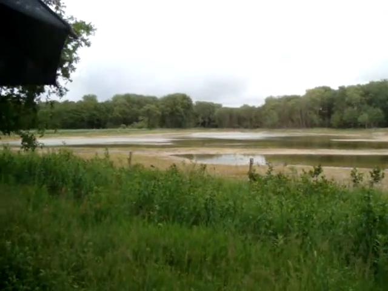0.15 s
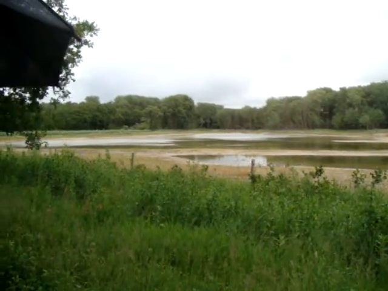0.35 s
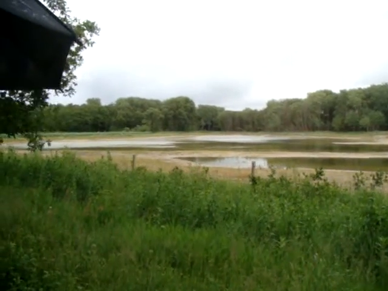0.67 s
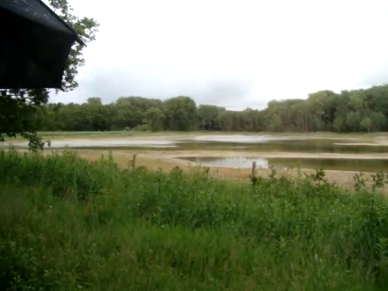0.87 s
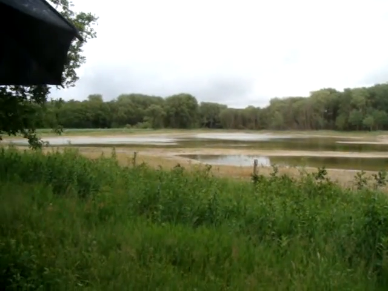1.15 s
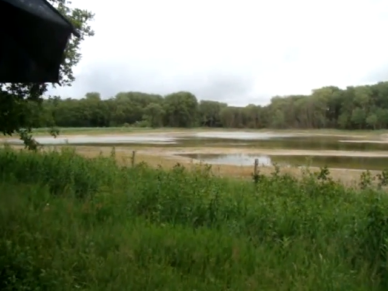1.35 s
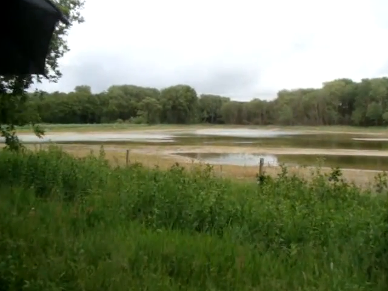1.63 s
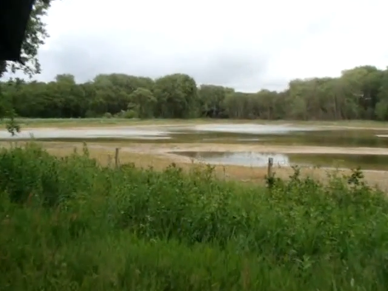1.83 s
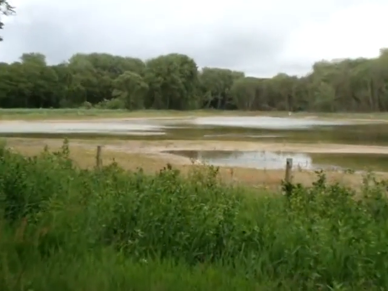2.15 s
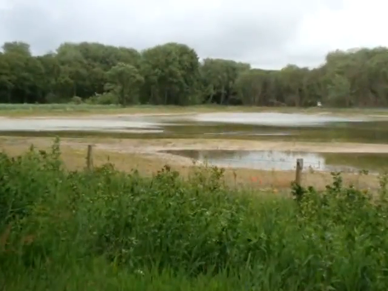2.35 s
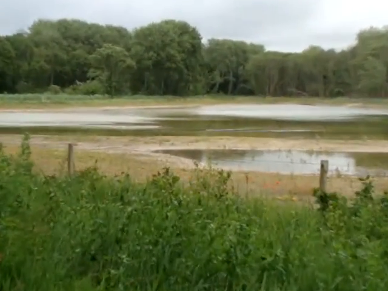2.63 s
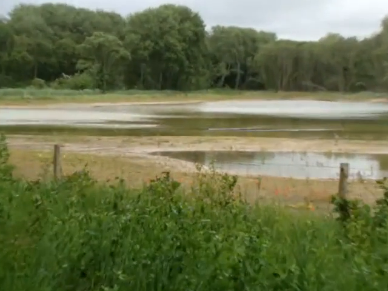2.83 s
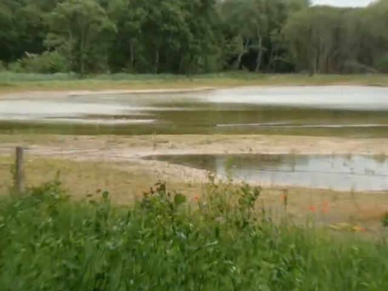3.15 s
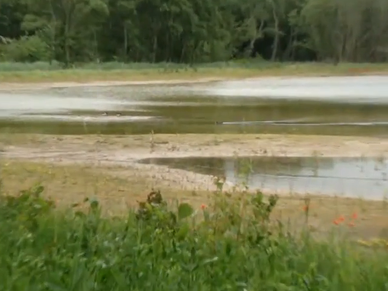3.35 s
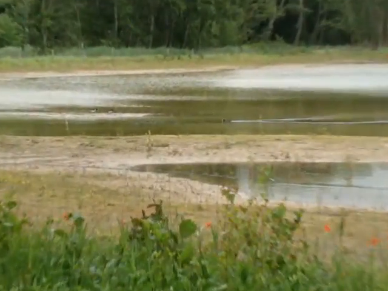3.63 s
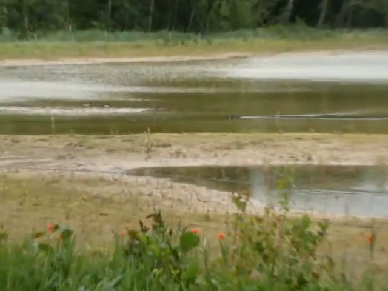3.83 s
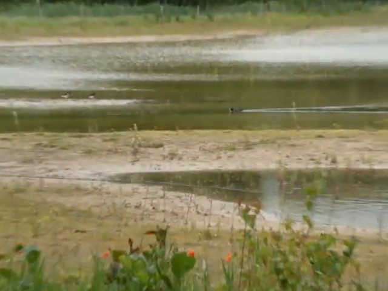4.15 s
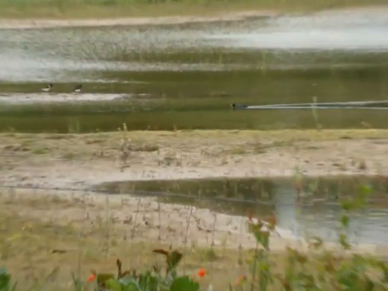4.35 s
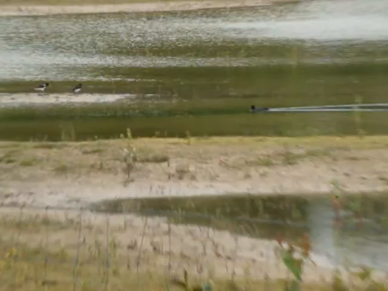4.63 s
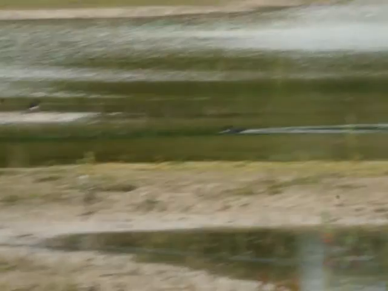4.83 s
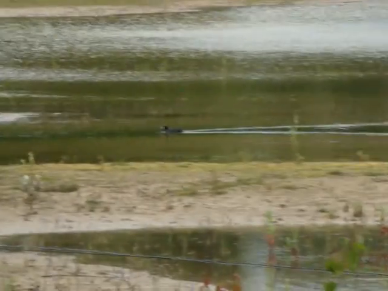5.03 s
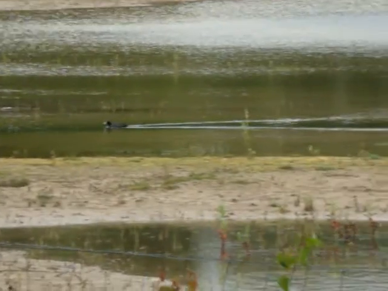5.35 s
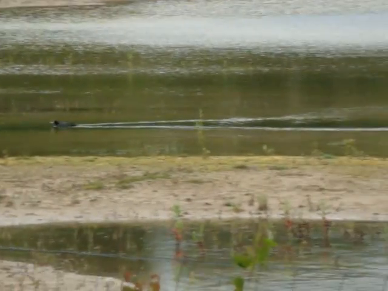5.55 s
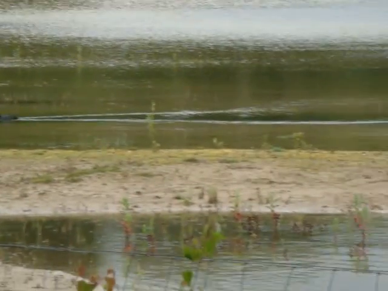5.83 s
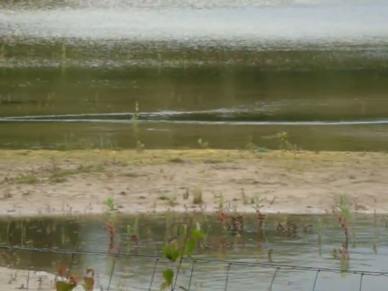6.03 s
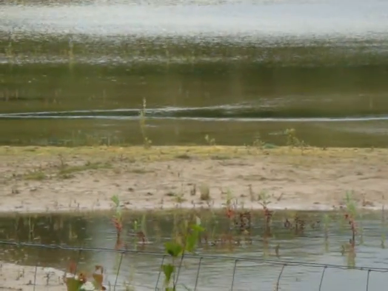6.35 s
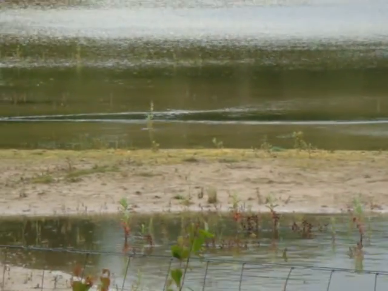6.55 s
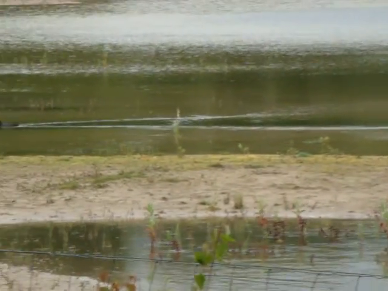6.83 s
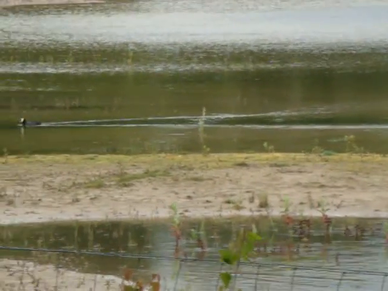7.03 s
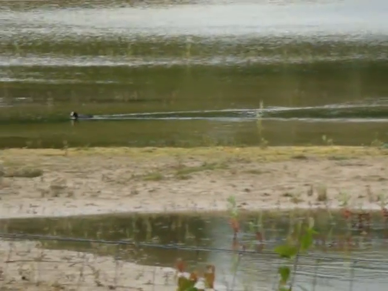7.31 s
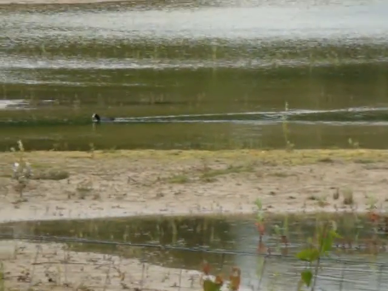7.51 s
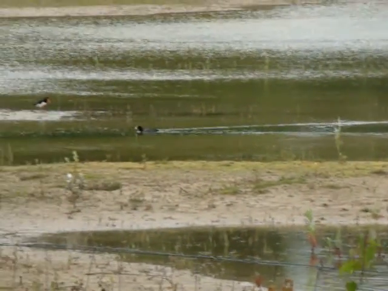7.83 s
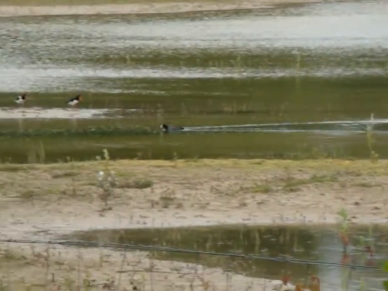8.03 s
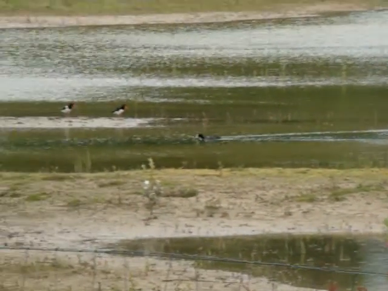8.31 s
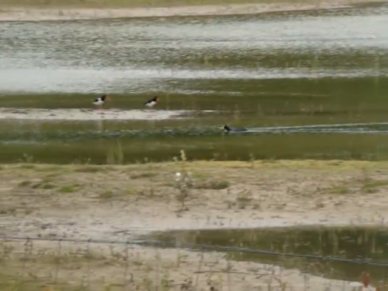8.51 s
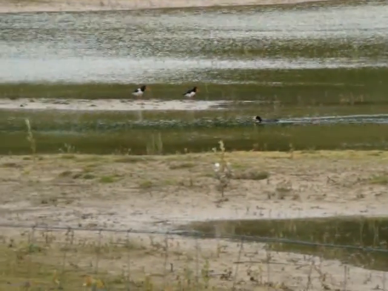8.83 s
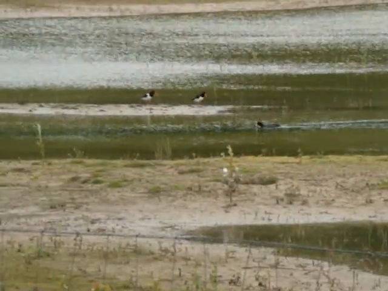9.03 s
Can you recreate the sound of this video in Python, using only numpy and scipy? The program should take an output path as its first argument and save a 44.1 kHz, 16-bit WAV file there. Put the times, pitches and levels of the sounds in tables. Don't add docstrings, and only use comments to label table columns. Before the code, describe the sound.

Outdoors at a wet marsh, a finger click on a small camera is followed at once by shorebirds' rapid, shrill piping, notes tumbling over one another. Low thumps, ticks and soft wind buffeting sit close to the microphone for about three seconds. The piping thins, faint frog and waterfowl clucks appear, then brisk whistles return and space out over a soft leafy hiss.

```python
import sys
import numpy as np
from scipy import signal
from scipy.io import wavfile
from scipy.ndimage import uniform_filter1d, minimum_filter1d, map_coordinates

SR = 44100
rng = np.random.default_rng(int(sys.argv[2]) if len(sys.argv) > 2 else 0)


def decibels_to_gain(level_db):
    exponent = np.asarray(level_db, float) / 20
    return 10 ** exponent


def store_pcm(level_fs):
    pcm = np.round(np.clip(level_fs, -1, 1) * 32767).astype(np.int16)
    wavfile.write(sys.argv[1], SR, np.atleast_2d(pcm).T)


N = 404397


def unit(x):
    return x / np.sqrt(np.mean(x ** 2) + 1e-20)


def along(points, hz):
    f, v = np.transpose(points)
    return np.interp(np.log(hz + 1), np.log(f + 1), v)


def curves(rows):
    s, *cols = np.transpose(rows)
    return [np.interp(np.arange(N) / SR, s, c) for c in cols]


def wobble(rate, size=N):
    knots = rng.standard_normal(int(size * rate / SR) + 4)
    return map_coordinates(knots, [np.arange(size) * rate / SR])


def add(track, s, sound):
    part = track[max(round(s * SR), 0):][:len(sound)]
    part += sound[:len(part)]


def rush(spectrum, patchy_db):
    hz, _, z = signal.stft(rng.standard_normal(N + 512), SR, nperseg=1024)
    field = uniform_filter1d(rng.standard_normal(z.shape), 10, 0)
    field = uniform_filter1d(field, 6, 1)
    gain_db = patchy_db * unit(field) + along(spectrum, hz)[:, None]
    return unit(signal.istft(z * decibels_to_gain(gain_db), SR, nperseg=1024)[1][:N])


# (time [s], murmur [dB], leaf hiss [dB])
MARSH_LEVELS = [
    (0.0, -48, -40.5),
    (0.25, -48.5, -46),
    (4.72, -45.5, -42.5),
    (6.03, -48.5, -49.5),
    (7.3, -48, -51),
    (9.17, -47.5, -52.5),
]
# (frequency [Hz], density [dB per Hz])
MURMUR_SPECTRUM = [(18, -59.5), (30, -39), (114, -33), (183, -14), (364, -7), (499, -3.5), (673, -2),
                   (2000, -8), (2600, -59.5), (4400, -120)]
# (frequency [Hz], density [dB per Hz])
LEAF_SPECTRUM = [(1200, -120), (1800, 0), (4000, 2.5), (6000, -1.5), (9000, -2), (10000, -9.5),
                 (10300, -40.5)]


def marsh():
    murmur_db, hiss_db = curves(MARSH_LEVELS)
    murmur = decibels_to_gain(murmur_db + 0.53 * wobble(10)) * rush(MURMUR_SPECTRUM, patchy_db=0.55)
    hiss = decibels_to_gain(hiss_db + 3.5) * rush(LEAF_SPECTRUM, patchy_db=0.4)
    return murmur + hiss


def knocks(events, t60, rough, rise, snap_db):
    out, t = np.zeros(N), np.arange(SR // 5) / SR
    for s, db, hz in events:
        drift = rough * np.cumsum(rng.standard_normal(len(t))) * np.sqrt(hz / SR)
        decay = decibels_to_gain(-60 * t / t60)
        tone = np.sin(2 * np.pi * hz * t + drift) * decay * (1 - np.exp(-t / rise))
        snap = decibels_to_gain(snap_db - 60 * t / 0.0096) * rng.standard_normal(len(t))
        add(out, s, decibels_to_gain(db + 6.0) * (tone + snap))
    return out


# (time [s], peak level [dB], pitch [Hz])
FROG_CLUCKS = [(3.684, -31.5, 696), (3.726, -34.5, 560), (3.96, -29, 590), (4.061, -32, 767),
               (4.192, -30, 726), (4.214, -28.5, 840), (4.249, -42, 820), (4.282, -31, 720),
               (4.343, -34, 826), (4.529, -27, 543), (4.574, -32, 755), (4.655, -30, 776),
               (4.723, -28, 742)]
# (time [s], peak level [dB], pitch [Hz])
FOWL_CLUCKS = [
    (4.6129, -43, 1395),
    (4.9578, -42, 1354),
    (5.1029, -43, 1204),
    (5.6952, -41.5, 1164),
    (5.7502, -40, 1240),
    (5.8301, -43, 1200),
    (6.4837, -41, 1232),
    (6.544, -42.5, 1280),
]


def far_clucks():
    frogs = knocks(FROG_CLUCKS, 0.03, rough=1.32, rise=0.0028, snap_db=-36)
    fowl = knocks(FOWL_CLUCKS, 0.13, rough=0.53, rise=0.0028, snap_db=-32)
    return signal.sosfilt(signal.butter(3, 350, "high", fs=SR, output="sos"), frogs + fowl)


# (time [s], buffet level [dB])
WIND_LEVELS = [
    (0.0, -60),
    (0.39, -57.5),
    (0.77, -55),
    (0.81, -49.5),
    (1.11, -56),
    (1.41, -54),
    (1.47, -53),
    (1.55, -53),
    (2.84, -51.5),
    (3.6, -58),
]
# (frequency [Hz], density [dB per Hz])
BUFFET_SPECTRUM = [(15, -36), (40, -9), (100, -8.5), (200, -7.5), (400, -3), (900, -36)]


def wind():
    lumps = decibels_to_gain(3.8 * wobble(25))
    return decibels_to_gain(curves(WIND_LEVELS)[0]) * unit(lumps * rush(BUFFET_SPECTRUM, patchy_db=-1.0))


# (time [s], peak level [dB], pitch [Hz])
FINGER_THUMPS = [(0.318, -34, 96), (0.369, -32.5, 217), (0.549, -39, 134), (0.599, -36.5, 153),
                 (0.824, -25, 188), (0.854, -33, 143), (0.994, -35.5, 249), (1.467, -33.5, 111),
                 (1.584, -37, 291), (1.644, -29.5, 430), (1.795, -31, 387), (1.849, -38, 352),
                 (2.14, -36, 140), (2.192, -32.5, 320), (2.299, -38, 145), (2.433, -34, 391),
                 (2.76, -43, 107), (2.868, -38, 206), (2.938, -47, 222), (3.099, -41, 89)]
# (time [s], peak level [dB], pitch [Hz])
CASE_CLICKS = [
    (0.0162, -35, 1005),
    (0.7567, -29, 1604),
    (.7615, -31, 3430),
    (0.9932, -36, 1170),
    (2.006, -35, 1000),
    (2.02, -37.5, 745),
    (2.034, -34, 1320),
    (2.9704, -29.5, 1217),
    (3.3782, -33, 1480),
    (3.7723, -38, 1160),
]


def hands():
    thumps = knocks(FINGER_THUMPS, 0.064, rough=2.22, rise=0.0034, snap_db=-41)
    clicks = knocks(CASE_CLICKS, 0.027, rough=1.68, rise=0.00027, snap_db=3)
    return signal.sosfilt(signal.butter(2, 70, "high", fs=SR, output="sos"), thumps + clicks)


# (frequency [Hz], decay t60 [s], strength [dB])
TREE_DECAY = [(1000, 0.66, -2), (2500, 0.99, 0.5), (3600, 0.67, -1.5), (4860, 0.52, 4.5), (8200, 0.43, 0.5)]
# (time [s], gain [dB])
TREE_ANSWER = [(0, -0.8), (1.2, 1.6), (2, -1.5), (3.3, -1), (4.2, 3), (5.22, 4.5), (5.3, -3), (5.5, 0),
               (5.7, 1), (6.8, -0.2), (8, 0), (9.17, 0.5)]


def trees(x):
    x = x * decibels_to_gain(curves(TREE_ANSWER)[0])
    gap = 0.032
    out, step = np.zeros(N), SR // 4
    for at in range(0, N, step):
        hz, t, z = signal.stft(rng.standard_normal(SR * 4 // 5), SR, nperseg=256)
        t60, strength_db = [along(np.array(TREE_DECAY)[:, [0, col]], hz)[:, None] for col in (1, 2)]
        shape = decibels_to_gain(-60 * t / t60) * (0.94 + np.clip(t / gap, 0, 1) ** 3)
        shape = shape / np.linalg.norm(shape, axis=1, keepdims=True)
        tail = signal.istft(z * shape * decibels_to_gain(strength_db), SR, nperseg=256)[1]
        add(out, at / SR, signal.fftconvolve(x[at:at + step], tail / np.linalg.norm(tail)))
    return out * decibels_to_gain(1.8 * wobble(70))


def ripples(x, t60):
    out, step, t = np.zeros(N), SR // 10, np.arange(SR // 25) / SR
    for at in range(0, N, step):
        bounces = rng.standard_normal(len(t)) * decibels_to_gain(-60 * t / t60)
        piece = x[at:at + 2 * step] * np.hanning(2 * step)[:N - at]
        add(out, at / SR + 0.001, signal.fftconvolve(piece, bounces / np.linalg.norm(bounces)))
    return out


# (time [s], length [s], top pitch [Hz], level [dB])
HEAD_ON_NOTES = [(1.98, 0.073, 2652, -23), (2.093, 0.028, 2590, -27.5), (2.227, 0.048, 2644, -27.5),
                 (2.444, 0.034, 2512, -34), (2.52, 0.03, 2524, -29), (2.564, 0.04, 2473, -33),
                 (2.604, 0.037, 2643, -27), (2.73, 0.033, 2508, -26), (4.468, 0.029, 2460, -41.5),
                 (4.835, 0.027, 2450, -45), (5.702, 0.021, 2226, -37), (5.828, 0.035, 2307, -38),
                 (5.886, 0.019, 2330, -38), (6.006, 0.033, 2294, -36), (6.046, 0.047, 2642, -37.5),
                 (6.313, 0.034, 2640, -31.5), (6.667, 0.035, 2487, -38.5), (6.808, 0.054, 2637, -40),
                 (7.171, 0.028, 2448, -29.5), (7.196, 0.028, 2473, -30), (7.228, 0.054, 2595, -29),
                 (7.378, 0.05, 2557, -29), (7.434, 0.034, 2400, -35.5), (7.507, 0.043, 2620, -32.5),
                 (7.699, 0.037, 2345, -38), (8.007, 0.027, 2430, -34.5), (8.717, 0.031, 2275, -36)]
HALF_TURNED_NOTES = [(0.135, 0.024, 3037, -24.5), (0.162, 0.044, 3040, -26.5), (1.556, 0.034, 2570, -33),
                     (0.735, 0.022, 2510, -30), (0.941, .032, 2606, -28.5), (1.962, 0.033, 2566, -27),
                     (2.13, 0.031, 2510, -22.5), (2.797, 0.044, 2613, -25), (2.906, 0.029, 2320, -33),
                     (2.953, 0.028, 2320, -30), (3.003, 0.024, 2290, -32), (3.056, 0.023, 2260, -36),
                     (3.095, 0.044, 2661, -26), (3.609, .033, 2493, -30.5), (3.725, 0.032, 2650, -36),
                     (5.5, 0.023, 2150, -38), (6.201, 0.042, 2460, -32.5), (6.225, .028, 2444, -28.5),
                     (6.278, 0.03, 2570, -32.5), (6.5, .042, 2612, -31.5), (6.581, 0.03, 2790, -32),
                     (7.016, 0.041, 2683, -35), (7.008, 0.052, 2606, -30.5), (7.533, 0.045, 2611, -31.5),
                     (7.812, 0.043, 2685, -30.5), (8.376, 0.03, 2230, -36)]
SIDE_ON_NOTES = [(0.062, 0.039, 2530, -30.5), (1.995, .036, 2480, -34), (1.882, 0.034, 2520, -39),
                 (0.442, 0.051, 2930, -28.5), (0.716, 0.084, 2970, -30.5), (.826, 0.028, 2960, -23),
                 (.812, .075, 2670, -30.5), (5.001, 0.058, 2453, -37.5), (1.611, 0.019, 2570, -25),
                 (2.181, 0.036, 2746, -20.5), (2.401, 0.055, 2830, -27), (3.165, 0.033, 2620, -48),
                 (6.752, 0.06, 2700, -33.5), (6.93, 0.038, 2420, -31.5), (6.952, 0.028, 2380, -34.5),
                 (3.043, 0.034, 2673, -22.5), (3.235, 0.044, 2645, -27.5), (3.429, 0.047, 2684, -29),
                 (3.465, 0.036, 2450, -35), (3.504, 0.05, 2634, -32.5), (5.629, 0.04, 2400, -30.5),
                 (6.427, 0.029, 2490, -29), (6.486, 0.028, 2398, -32.5), (6.725, 0.051, 2500, -34.5),
                 (7.26, 0.03, 2576, -29.5), (8.029, 0.035, 2670, -28.5)]
TURNED_AWAY_NOTES = [(0.086, 0.029, 2500, -27.5), (0.23, 0.026, 2475, -28.5), (0.282, 0.017, 2430, -31.5),
                     (0.33, 0.023, 2380, -32), (0.636, 0.033, 2363, -32), (1.076, 0.029, 2620, -32),
                     (1.025, 0.058, 2930, -27.5), (1.538, 0.038, 2416, -31), (1.618, 0.033, 2924, -24),
                     (1.764, 0.037, 2500, -24.5), (1.817, .036, 2910, -23), (1.841, 0.031, 2420, -32),
                     (4.864, 0.025, 2080, -41), (2.327, 0.04, 2483, -25.5), (3.291, 0.043, 2610, -30.5),
                     (3.335, 0.019, 2310, -38), (3.391, 0.021, 2300, -34), (3.641, 0.075, 2640, -30.5),
                     (4.524, 0.062, 2460, -41), (5.227, 0.04, 2274, -38.5), (5.321, 0.041, 2440, -35.5),
                     (5.439, 0.032, 2425, -32), (5.945, 0.036, 2440, -33.5)]
BEAM_LEVELS = [-1.5, -5, -8.5, -9.5]


def arched_notes():
    easy_hz, notes = 2500, []
    tables = [HEAD_ON_NOTES, HALF_TURNED_NOTES, SIDE_ON_NOTES, TURNED_AWAY_NOTES]
    for rows, over_db in zip(tables, BEAM_LEVELS):
        for s, length, hz, db in rows:
            arch = 0.036 + 1.3 * length + 0.25 * max(np.log2(hz / easy_hz), 0)
            notes.append((s, length, hz, arch, -0.02, 0.22, 0.2, db, over_db))
    return notes


# (time [s], top pitch [Hz], level [dB])
FAR_PIPS = [
    (3.718, 3100, -29.5),
    (4.003, 3147, -31.5),
    (4.256, 3046, -33.5),
    (4.57, 3050, -35),
]


def pips():
    return [(s, 0.027, hz, 0.0492, -0.02, 0.11, 0.12, db, -11.5) for s, hz, db in FAR_PIPS]


# (time [s], length [s], top pitch [Hz], level [dB], overtones [dB])
CLIMBING_NOTES = [(0.345, 0.045, 2642, -27.5, -9.5), (2.646, 0.039, 2846, -27, -11),
                  (2.881, .05, 2783, -24.5, -7.5), (5.421, 0.035, 2976, -28, -18),
                  (5.736, 0.043, 2956, -31.5, -15), (7.778, 0.052, 2700, -32.5, -4),
                  (8.088, 0.054, 2782, -30.5, -5.5), (8.245, 0.039, 2680, -30.5, -7),
                  (8.442, .046, 2758, -31, -6), (8.508, 0.046, 2793, -33.5, -9),
                  (8.806, 0.053, 2787, -27.5, -3.5), (9.044, 0.043, 2780, -29, -13)]


def climbing_notes():
    return [(s, length, hz, 0.16, 0.0506, 0.15, 0.2, db, over_db)
            for s, length, hz, db, over_db in CLIMBING_NOTES]


# (time [s], length [s], pitch [Hz], level [dB], overtones [dB])
WHISTLE_NOTES = [(0.538, 0.15, 3293, -26, -3), (1.101, 0.029, 2962, -23, -8), (1.141, .04, 2680, -27.5, -5),
                 (1.273, 0.026, 2980, -46, -6), (1.314, .04, 2929, -32, 0.5), (2.012, 0.14, 3408, -23.5, -7.5),
                 (2.321, 0.037, 2680, -35, -12), (2.558, 0.12, 3310, -25.5, -5),
                 (4.853, 0.039, 2950, -41.5, -16), (5.144, 0.032, 2910, -34.5, -16),
                 (5.313, 0.14, 3221, -32.5, -6.5)]


def whistles():
    easy_hz, breath_s, notes = 3277, 0.138, []
    for s, length, hz, db, over_db in WHISTLE_NOTES:
        lean = -0.5 * max(hz / easy_hz - 1, 0)
        drop = 0.07 if length > breath_s else 0.003
        notes.append((s, length, hz, 0.14 * length, lean, 0.027, drop, db, over_db))
    return notes


# (time [s], length [s], pitch [Hz], level [dB])
HELD_NOTES = [
    (1.219, 0.073, 2414, -43),
    (1.297, .085, 2732, -30),
    (1.489, 0.09, 2719, -27.5),
    (1.738, 0.089, 2720, -27.5),
    (3.858, 0.098, 2583, -42.5),
    (4.075, 0.09, 2580, -42.5),
]


def held_notes():
    return [(s, length, hz, 0.032, 0.009, 0.04, 0.02, db, -2) for s, length, hz, db in HELD_NOTES]


# (time [s], mid pitch [Hz], level [dB])
FALLING_NOTES = [
    (3.885, 2235, -45.5),
    (4.112, 2200, -48.5),
    (4.318, 2130, -47),
    (4.54, 2116, -48),
    (4.765, 2100, -46.5),
    (5.004, 2214, -51.5),
]


def falling_notes():
    return [(s, 0.099, hz, 0.045, -0.2, 0.04, 0.03, db, 4) for s, hz, db in FALLING_NOTES]


# (time [s], gain of multiples 3 and 4 [dB], fundamental's loss per unit of sag [dB],
# octave's loss per unit of sag [dB], arch depth [share])
STANCE = [(0, -1, 20, 36, 1.1), (1.2, -2, 24, 42, .9), (2, -3, 17, 40, .95), (3.3, -2.5, 22, 38, .95),
          (4.2, -9, 34, 8, .95), (5.4, -9, 26, 10, .95), (6, -12.5, 24, 8, 1.05), (6.5, -7, 24, 10, 1.05),
          (6.7, -3, 30, 40, .85), (7.15, -2.5, 34, 34, .55), (7.6, -2, 36, 36, .55),
          (7.75, -2, 22, 42, 1.05), (8.6, -1, 22, 40, 1.05), (9.17, 0, 24, 30, 1.05)]
HIGH_SLACK = [43.5, 47]
# (frequency [Hz], gain [dB])
THROAT_GAIN = [(1000, -13), (1900, -11.5), (2500, 0.5), (3300, 0.5), (4100, -9.5), (5000, 0.5), (6200, -9),
               (7400, 7.5), (8600, -13.5), (10000, -10.5)]
OVERTONE_LEVELS = [0, 0.9, -1.2]


def pipers():
    out, flutter, waver = np.zeros(N), [wobble(110) for _ in range(4)], wobble(120)
    facing_db, *loss_db, depth = curves(STANCE)
    notes = arched_notes() + pips() + climbing_notes() + whistles() + held_notes() + falling_notes()
    foot = 0.009
    for s, length, hz, arch, lean, scoop, drop, db, over_db in notes:
        t = np.arange(-foot, length + 0.012, 1 / SR)
        now = np.minimum(round((s - foot) * SR) + np.arange(len(t)), N - 1)
        u = 2 * t / length - 1
        rise = np.logaddexp(0, -t / 0.0033)
        fall = np.logaddexp(0, (t - length) / 0.006)
        sag = np.clip(depth[now] * arch * u * u + scoop * rise + drop * fall, 0, 0.6)
        pitch = hz * (1 - sag + lean * u + 0.0027 * waver[now])
        phase = 2 * np.pi * np.cumsum(pitch) / SR
        edges = np.clip(np.minimum((t - t[0]) / 0.0036, (t[-1] - t) / 0.0041), 0, 1)
        for k, level_db in enumerate([0] + [over_db + o for o in OVERTONE_LEVELS]):
            colour_db = along(THROAT_GAIN, (k + 1) * pitch)
            if k == 0:
                colour_db = colour_db - along(THROAT_GAIN, hz)
            if k > 1:
                colour_db = colour_db + facing_db[now]
            slack_db = -(loss_db[k][now] if k < 2 else HIGH_SLACK[k - 2]) * sag
            shimmer_db = (1.64 + 0.56 * k) * flutter[k][now]
            gain = decibels_to_gain(db + 4.5 + level_db + colour_db + slack_db + shimmer_db)
            add(out, s - foot, edges * gain * np.sin((k + 1) * phase))
    return out


def scene():
    birds, far = pipers(), far_clucks()
    glances = decibels_to_gain(-7) * ripples(birds, t60=0.06)
    answer = decibels_to_gain(-5.0) * trees(birds + far)
    return (birds + far + glances + answer + hands() + marsh() + wind())[None]


def starved(x, margin_db, chance_db, grain):
    hz, _, z = signal.stft(x, SR, nperseg=512, noverlap=256)
    hiss = signal.stft(rng.standard_normal(N), SR, nperseg=512, noverlap=256)[2]

    def per_band(v):
        return np.add.reduceat(np.abs(v) ** 2, np.arange(0, len(hz), 6)) + 1e-16

    def spread(v):
        return np.repeat(v, 6, axis=0)[:len(hz)]

    level_db = 10 * np.log10(per_band(z))
    coming_db = -minimum_filter1d(-level_db, size=5, axis=1, origin=-2)
    luck = rng.standard_normal((2, *level_db.shape))
    weak = level_db + chance_db * luck[0] < coming_db - margin_db
    standing = (level_db - np.median(level_db[9:19], axis=0)) / 12
    plain = unit(uniform_filter1d(luck[1], 3, 1)) + standing < grain
    swapped = spread(plain) & (hz[:, None] > 5200)
    z = np.where(swapped, hiss * spread(np.sqrt(per_band(z) / per_band(hiss))), z)
    keep = 1 - 0.97 * spread(weak) * (hz[:, None] > 3400)
    return signal.istft(z * keep, SR, nperseg=512, noverlap=256)[1][:N]


def band_limit(x):
    return signal.sosfilt(signal.butter(12, 10830, fs=SR, output="sos"), x)


def record(dry):
    top = signal.ellip(8, 0.5, 50, 10050, fs=SR, output="sos")
    low = signal.butter(2, 40, "high", fs=SR, output="sos")
    kept = starved(dry[0], margin_db=9.3, chance_db=3.5, grain=0.6)
    mix = signal.sosfilt(np.vstack([top, low]), kept)[None]
    return band_limit(mix)


dry = scene()
out = record(dry)
store_pcm(out)
```